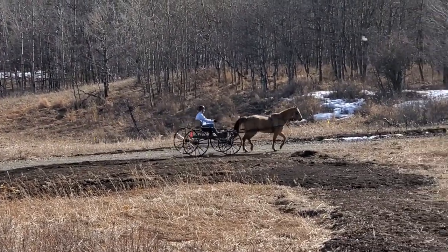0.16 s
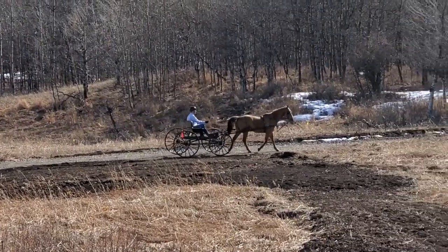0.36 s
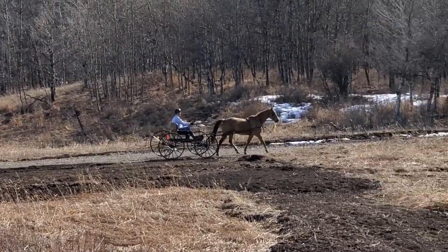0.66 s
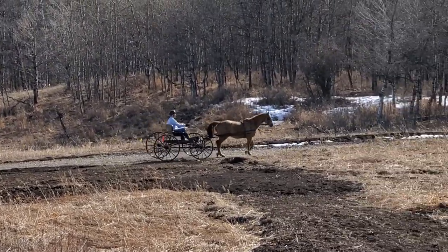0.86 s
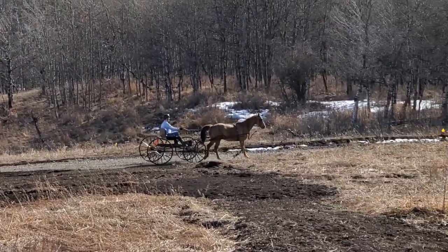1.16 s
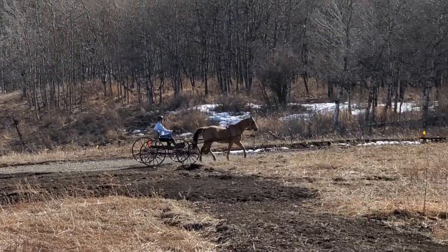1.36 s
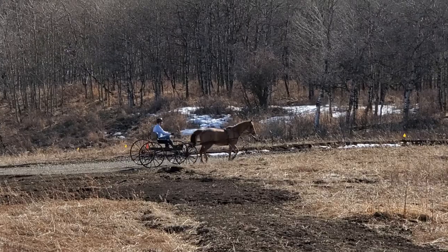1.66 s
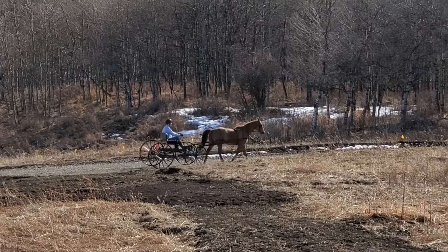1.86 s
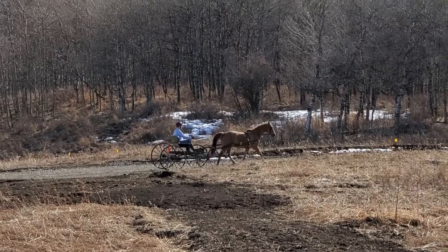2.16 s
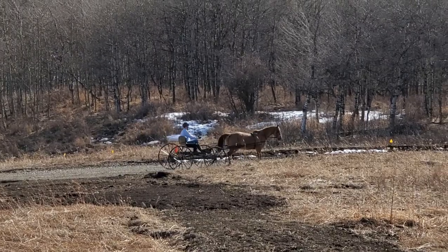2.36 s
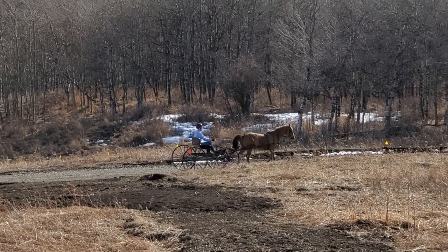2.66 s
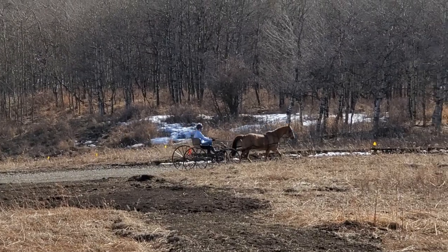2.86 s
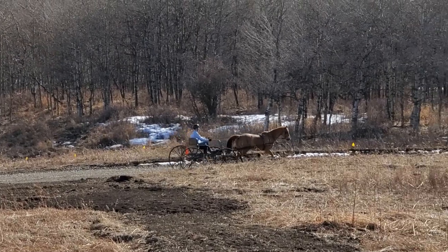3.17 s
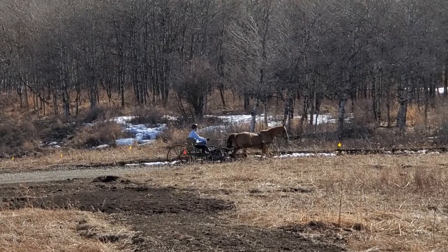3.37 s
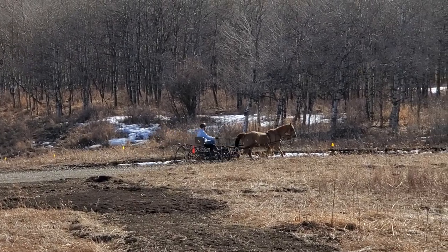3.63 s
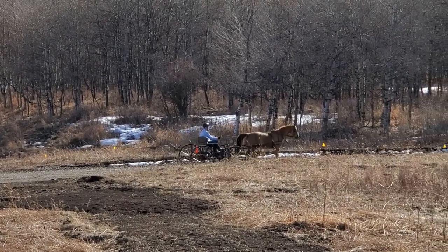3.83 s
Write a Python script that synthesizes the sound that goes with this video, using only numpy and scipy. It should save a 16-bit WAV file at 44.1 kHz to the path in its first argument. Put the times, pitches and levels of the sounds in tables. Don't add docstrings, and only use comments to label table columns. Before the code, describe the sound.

A horse and light buggy pass far off on gravel, hooves and small stones clicking, busiest midway; wind rumbles separately on each side of the microphone over faint hiss and a hush of bare trees.

```python
import sys
import numpy as np
from scipy import signal
from scipy.fft import rfft, irfft, next_fast_len
from scipy.io import wavfile
from scipy.ndimage import uniform_filter1d, map_coordinates

SR = 44100
rng = np.random.default_rng(int(sys.argv[2]) if len(sys.argv) > 2 else 0)


def master_out(mix):
    frames = np.transpose(np.atleast_2d(mix))
    ceiling = np.clip(frames, -1, 1)
    pcm = np.round(ceiling * 32767).astype(np.int16)
    wavfile.write(sys.argv[1], SR, pcm)


def gain_from_db(level_db):
    decades = np.asarray(level_db, float) / 20
    return 10 ** decades


N = 176400
T = np.arange(N) / SR
RISE_S = 0.0025
# (frequency [Hz], phase [rad])
ROAD_LAG = [(1200, -2.7), (1800, -6.3), (4100, -6.3), (6800, -3.2)]


def unit(x):
    return x / np.sqrt(np.mean(x ** 2) + 1e-20)


def along(points, hz):
    f, v = np.transpose(points)
    return np.interp(np.log(hz + 1), np.log(f + 1), v)


def curves(rows):
    s, *cols = np.transpose(rows)
    return [np.interp(T, s, c) for c in cols]


def wobble(rate):
    return map_coordinates(rng.standard_normal(400), [T * rate])


def filtered(x, response):
    m = next_fast_len(N + SR // 4)
    return irfft(rfft(x, m) * response(np.fft.rfftfreq(m, 1 / SR)), m)[..., :N]


def coloured_noise(colour):
    return filtered(rng.standard_normal(N), lambda f: gain_from_db(along(colour, f)))


def patchy(depth_db):
    z = signal.stft(rng.standard_normal((2, N)), nperseg=512)[2]
    field = rng.standard_normal(z.shape[1:])
    field = uniform_filter1d(field, size=5, axis=0)
    field = uniform_filter1d(field, size=12, axis=1)
    return signal.istft(z * gain_from_db(depth_db * unit(field)), nperseg=512)[1][:, :N]


def ports(pair, left, right, alike, lag):
    u = np.arccos(np.clip(alike, 0, 1)) / 2
    shared, apart = np.cos(u) * pair[0], np.sin(u) * pair[1]

    def response(f):
        return [gain_from_db(along(left, f)) * np.exp(1j * along(lag, f)), gain_from_db(along(right, f)) + 0j]

    return filtered(np.array([shared + apart, shared - apart]), response)


def hiss():
    # (time [s], level [dB])
    air = [(0, -81), (.25, -77.5), (.52, -80.5), (.78, -78.5), (1.35, -76.5), (1.6, -82), (1.93, -80),
           (1.98, -75), (2.15, -77), (2.2, -82), (2.35, -75.5), (2.85, -78.5), (3.1, -76.5), (3.3, -73.5),
           (3.52, -77), (3.62, -74.5), (3.75, -72.5), (4, -77.5)]
    # (frequency [Hz], level [dB per Hz])
    hiss_left = [(200, -37), (3000, -12.5), (6500, -5.5), (7300, -14.5), (9000, -15), (13000, -9),
                 (14800, -2), (15500, -6)]
    hiss_right = [(200, 3), (3000, -11), (6300, -8), (7600, -17), (9500, -16), (11100, 1), (12300, -13),
                  (15500, -16.5)]
    level_db = curves(air)[0] + 7 + 1.3 * wobble(13)
    return gain_from_db(level_db) * unit(ports(patchy(depth_db=-1.1), hiss_left, hiss_right, 0, [(1, 0.0026)]))


def woods():
    # (time [s], hush level [dB], ridge level [dB], ridge pitch [Hz])
    drift = [(0, -61.5, -57.5, 650), (.25, -59, -63.5, 691.5), (.45, -61, -64.5, 728),
             (.6, -60, -74, 721.5), (.85, -59.5, -76, 702), (.95, -65, -65.5, 659.5),
             (1.1, -60.5, -62.5, 677.5), (1.4, -60.5, -60, 733.6), (1.65, -64, -63, 741),
             (1.85, -65.5, -59, 698.6), (2.1, -61.5, -63, 730.7), (2.4, -60.5, -62, 687.6),
             (2.8, -62.5, -68, 668.6), (3.1, -61.5, -61, 655), (3.5, -62, -59.5, 632.5),
             (3.84, -59, -59.5, 638.7), (4, -66, -66.5, 624)]
    # (frequency [Hz], level [dB per Hz])
    hush_colour = [(170, -32), (310, -19), (440, -19.5), (618, -1), (800, -3.5), (1010, -4), (1500, -24.5),
                   (2400, -76)]
    # (frequency [Hz], phase [rad])
    woods_lag = [(800, -0.85), (1200, -1.5), (1800, -4.5)]
    ridge_width_hz = 80
    hush_db, ridge_db, ridge_hz = curves(drift)
    hush = unit(ports(patchy(depth_db=1.04), hush_colour, hush_colour, 1, woods_lag))

    def slow_noise():
        return filtered(rng.standard_normal((2, N)), lambda f: np.exp(-(f / ridge_width_hz) ** 1.12))

    turn = 2 * np.pi * np.cumsum(ridge_hz) / SR
    band = slow_noise() * np.cos(turn) + slow_noise() * np.sin(turn)
    ridge = unit(ports(band, [(1, 0.0043)], [(1, 0)], 0.94, woods_lag))
    return gain_from_db(hush_db) * hush + gain_from_db(ridge_db) * ridge


def ticks():
    # (time [s], peak level [dB], centre [Hz])
    snaps = [
        (.0711, -72, 8800),
        (0.1844, -61, 12100),
        (.3406, -60, 3060),
        (.612, -65, 11000),
        (2.229, -62, 7600),
        (2.554, -64, 6400),
        (3.612, -62, 5470),
    ]
    life_s, span = 0.016, 1.2
    out, t = np.zeros((2, N + SR)), np.arange(SR // 50) / SR
    for s, db, hz in snaps:
        noise = [[1, 0.69], [1, -0.39]] @ rng.standard_normal((2, len(t)))
        snap = noise * np.exp(-t / life_s * 4.2)
        band = signal.butter(2, [hz / span, hz * span], "band", fs=SR, output="sos")
        out[:, round(s * SR):][:, :len(t)] += gain_from_db(db + 7.5) * signal.sosfilt(band, snap)
    return out[:, :N]


def evened(x):
    power = uniform_filter1d(uniform_filter1d(x * x, size=800), size=800)
    return unit(x / np.sqrt(np.abs(power)))


def buffet(gusts):
    # (frequency [Hz], level [dB per Hz])
    thud = [(12, -35.5), (28, -11), (48, 2), (85, 4.5), (140, -21.5), (310, -31.5), (430, -52), (900, -100)]
    roar = [(40, -58), (100, 6), (170, 2), (300, -27.5), (500, -30), (1200, -120)]
    lull_db, lumps_db, flank = -54.5, 1.02, 1.5
    roar_db, roar_grows = -6.5, 1.92
    power = sum(gain_from_db(2 * db - 17.0 * np.abs(2 * (T - s) / length) ** flank) for s, db, length in gusts)
    lull = gain_from_db(2 * lull_db + 3.6 * wobble(3.74))
    gain = np.sqrt(power + lull) * gain_from_db(lumps_db * wobble(30.104))
    roar_gain = gain_from_db(roar_db) * (gain / gain_from_db(-20)) ** (roar_grows - 1)
    return gain * (evened(coloured_noise(thud)) + roar_gain * evened(coloured_noise(roar)))


def wind():
    # (time [s], level [dB], length [s])
    gusts_left = [(0.081, -39, 0.064), (0.173, -37, 0.038), (0.449, -45, 0.086), (0.57, -35, 0.06),
                  (0.706, -31, 0.052), (1.084, -24, 0.11), (1.257, -44, 0.025), (1.417, -60, 0.055),
                  (1.586, -40, 0.11), (1.929, -48, 0.078), (2.242, -37, 0.064), (2.38, -16, 0.033),
                  (2.596, -30.5, 0.062), (2.91, -34.5, 0.077), (2.975, -24.5, 0.079), (3.04, -23.5, 0.041),
                  (3.16, -29, 0.11), (3.097, -19, 0.035), (3.305, -24, 0.058), (3.36, -27, 0.05),
                  (3.657, -39, 0.16), (3.783, -28, 0.13),
                  (0.758, -39.5, 0.13),
        (2.338, -24, 0.064),
        (2.495, -37, 0.19),
        (2.705, -43, 0.2),
        (3.252, -19.5, 0.059),
        (3.408, -21, 0.065),
        (1.056, -26.5, 0.059),
        (3.978, -41.5, 0.17),
    ]
    gusts_right = [(0.242, -38.5, 0.055), (0.362, -43.5, 0.12), (0.647, -37.5, 0.04), (0.729, -32.5, 0.024),
                   (0.795, -38.5, 0.068), (1.021, -19.5, 0.052), (1.183, -36, 0.085), (1.364, -43.5, 0.14),
                   (1.766, -47, 0.13), (1.988, -38, 0.023), (2.07, -32, 0.087), (2.237, -43, 0.2),
                   (2.342, -32, 0.054), (2.469, -33.5, 0.093), (2.599, -40, 0.067), (2.679, -39.5, 0.047),
                   (2.744, -38, 0.041), (2.9, -30.5, 0.065), (2.98, -32, 0.094), (3.04, -35, 0.045),
                   (3.12, -32, 0.06), (3.165, -31, 0.052), (3.22, -28.5, 0.058), (3.28, -29.5, 0.052),
                   (3.345, -28.5, 0.077), (3.435, -37, 0.072), (3.558, -32.5, 0.084), (3.727, -27, 0.14),
                   (1.084, -37, .08),
        (3.852, -47, 0.29),
    ]
    return np.array([buffet(gusts_left), buffet(gusts_right)])


def behind_bank():
    # (time [s], level [dB])
    bend = [(0, -77), (.3, -71), (.8, -68.5), (.92, -73), (2.5, -69), (2.85, -65), (3.02, -59), (3.15, -63),
            (3.3, -63.5), (4, -66.5)]
    # (frequency [Hz], level [dB per Hz])
    dull = [(700, -57), (1100, 2.5), (1750, -6), (2400, -21.5), (6000, -65)]
    muffled = unit(ports(patchy(depth_db=1.2), dull, dull, 0.67, ROAD_LAG))
    return gain_from_db(curves(bend)[0] + 1.4 * wobble(20)) * muffled


def stones():
    per_s, spread_db, middle_hz = 1300, 3, 3000
    cycles = 7
    draw, k = rng.random((2, int(per_s * N / SR), 3)), np.arange(220)
    hz = middle_hz * 3.27 ** (2 * draw[..., :1] - 1)
    size = gain_from_db(-spread_db * np.log(1 - draw[..., 1:2]))
    ring = size * np.sin(2 * np.pi * hz * k / SR) * np.exp(-hz * k / SR / cycles)
    at = (draw[..., 2:] * N).astype(int) + k
    rows = [np.bincount(a.ravel(), r.ravel(), N + len(k))[:N] for a, r in zip(at, ring)]
    return unit(np.array(rows))


def pings():
    # (time [s], peak level [dB], pitch [Hz])
    loose = [(1.131, -48, 2130), (1.143, -53, 2200), (1.700, -60, 2940), (1.718, -56, 1540),
             (1.779, -56, 4700), (1.780, -56, 1850), (1.800, -59, 2280), (1.815, -65, 2000),
             (1.862, -60, 4500), (1.882, -58, 2400), (1.925, -48, 1590), (2.017, -61, 4407),
             (2.037, -55, 2600), (2.099, -55, 4260), (2.203, -52, 2320), (2.233, -49, 4120),
             (2.273, -57, 5700), (2.276, -51, 2790), (2.330, -54, 4050), (2.409, -55, 2700),
             (2.410, -60, 4500), (2.438, -49, 2050), (2.486, -58, 1845), (2.500, -48, 2160),
             (2.518, -56, 1800), (2.561, -57, 6070), (2.620, -56, 2820), (2.722, -49, 2560),
             (2.757, -54, 1920), (2.793, -57, 4000), (2.810, -53.5, 2590), (2.815, -50, 1800),
             (2.824, -58, 6150), (3.23, -54, 1530), (3.293, -53, 1510), (3.314, -56, 1700)]
    decay_s, onset_s = 0.0055, 0.0006
    out, t = np.zeros(N + SR), np.arange(SR // 20) / SR
    shape = np.exp(-t / decay_s) * (1 - np.exp(-t / onset_s))
    for s, db, hz in loose:
        out[round(s * SR):][:len(t)] += gain_from_db(db) * np.sin(2 * np.pi * hz * t) * shape
    return out[:N] * [[1], [0]]


def low_part(f):
    return 1 / (1 + (f / 3400) ** 4)


def jolt(grains):
    # (frequency [Hz], level [dB])
    modes = [(1580, 7), (2130, 1), (2430, -1), (2900, -9), (4050, -3.5), (5150, -1)]
    start_s, level_db, hold_s = 1.733, -55, 0.03
    age = np.clip(T - start_s, 0, None)
    shudder = gain_from_db(level_db) * np.minimum(age / RISE_S / 2, 1) * np.exp(-(age / hold_s) ** 4)
    ring = sum(gain_from_db(db) * np.sin(2 * np.pi * hz * age) for hz, db in modes) * [[1], [0]]
    grating = filtered(grains, lambda f: low_part(f * 0.75) * (1 - low_part(f * 2.6)))
    return shudder * (ring + 5 * grating)


def wheels():
    # (time [s], level [dB])
    rolling = [(0, -82), (.45, -73), (.85, -70.5), (1.35, -67.5), (1.6, -72), (1.95, -71), (2.17, -69),
               (2.5, -69.5), (2.9, -71), (3.45, -79), (3.66, -84), (4, -77)]
    roll = gain_from_db(curves(rolling)[0] + 8.5 + 0.32 * wobble(22.09))
    return roll * (patchy(depth_db=0.7) + 0.45 * stones())


def crunches(grains):
    # (time [s], peak level [dB], length [s], brightness [dB])
    bursts = [(0.6139, -48, 0.042, 1), (0.761, -43.5, 0.024, 4), (0.93, -50.5, 0.02, 6.5),
              (1.0903, -44.5, 0.023, 0.5), (1.13, -53, 0.057, -5), (1.537, -50.5, 0.013, -1),
              (1.705, -51.5, 0.043, -5), (1.98, -52, 0.019, 2), (2.294, -51, 0.01, 1),
              (1.779, -46.5, 0.033, -3.5), (1.88, -58, 0.037, -13.5), (2.031, -47, 0.024, -6),
              (2.096, -51.5, 0.025, -9), (2.2275, -43, 0.025, -7), (2.272, -44, 0.014, 1),
              (2.328, -53, 0.041, 2.5), (2.406, -48, 0.043, 3), (2.488, -57.5, 0.066, -11.5),
              (2.553, -42.5, 0.01, -6.5), (2.604, -45, 0.014, -6), (2.809, -48, 0.021, -4),
              (3.314, -48, 0.011, -5), (3.613, -50, 0.014, 4), (3.652, -53, 0.025, 6),
              (3.7806, -42, 0.02, -0.5)]
    low, high = np.zeros(N), np.zeros(N)
    for s, db, length, bright_db in bursts:
        age = np.clip(T - s + RISE_S, 0, None)
        decay = np.exp(-(age / max(length, 0.004)) ** 0.82)
        shape = gain_from_db(db - 4.5) * np.minimum(age / RISE_S, 1) * decay
        low += shape * gain_from_db(-bright_db)
        high += shape * gain_from_db(bright_db)
    return filtered(low * grains, low_part) + filtered(high * grains, lambda f: 1 - low_part(f))


def gravel():
    # (frequency [Hz], level [dB per Hz])
    gravel_left = [(1000, -6), (1600, -7.5), (2450, 0.5), (3300, -11), (4000, 1), (5200, -11.5),
                   (6600, -10.5), (9000, -16)]
    gravel_right = [(1000, -9), (1700, -10.5), (2900, -3), (3800, -12.5), (4500, -2), (6100, -2),
                    (7300, -13), (10000, -27)]
    grains = patchy(depth_db=1) + 0.55 * stones()
    road = wheels() + crunches(grains) + jolt(grains) + pings()
    treble_end = [(16000, -31)]
    return ports(road, gravel_left + treble_end, gravel_right + treble_end, 0.6, ROAD_LAG)


def scene():
    return hiss() + woods() + ticks() + wind() + behind_bank() + gravel()


def roll_off(x):
    return signal.sosfilt(signal.butter(12, 16310, fs=SR, output="sos"), x)


def record(dry):
    top_hz = 15770
    mix = filtered(dry, lambda hz: hz < top_hz)
    return roll_off(mix)


dry = scene()
out = record(dry)
master_out(out)
```